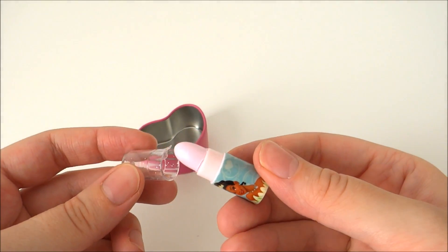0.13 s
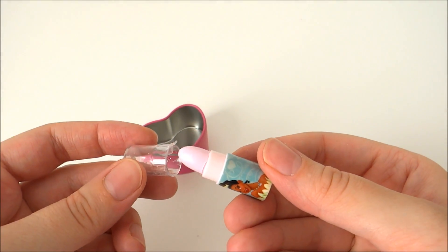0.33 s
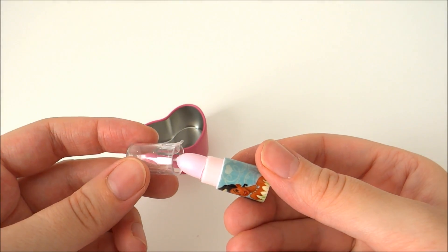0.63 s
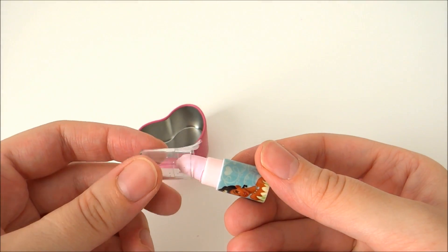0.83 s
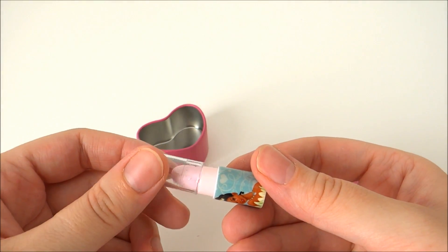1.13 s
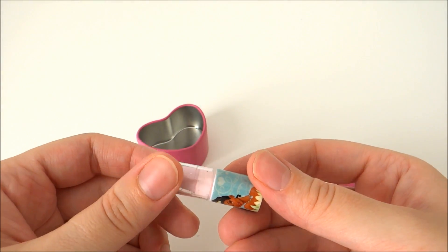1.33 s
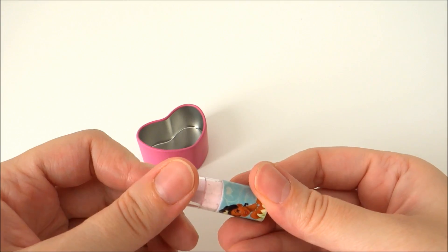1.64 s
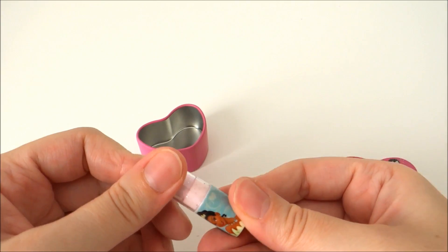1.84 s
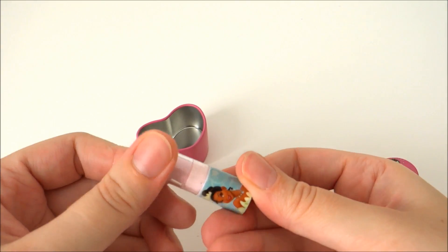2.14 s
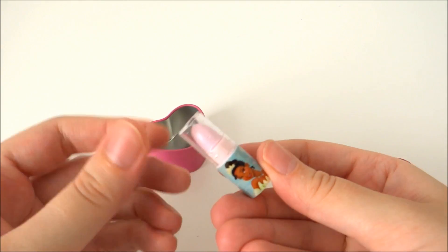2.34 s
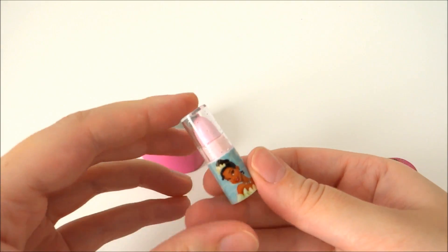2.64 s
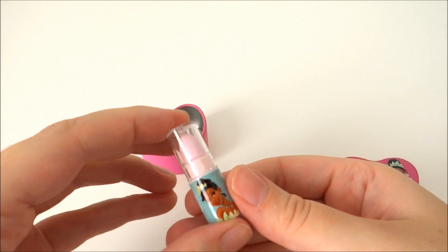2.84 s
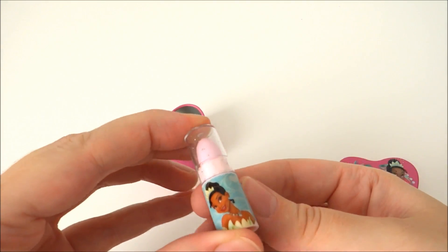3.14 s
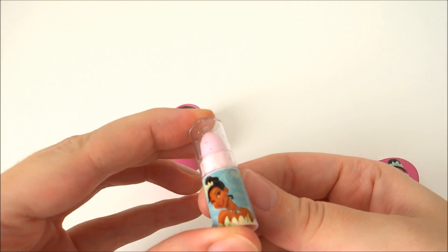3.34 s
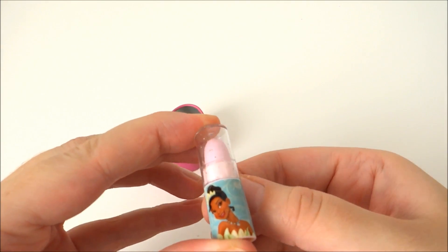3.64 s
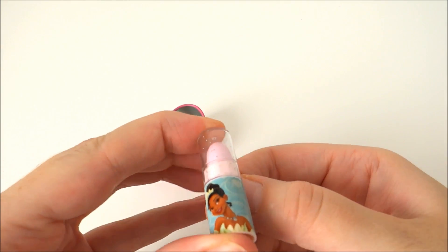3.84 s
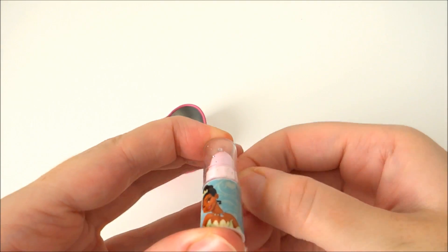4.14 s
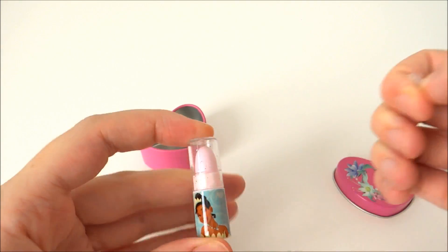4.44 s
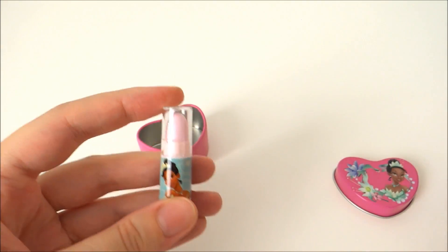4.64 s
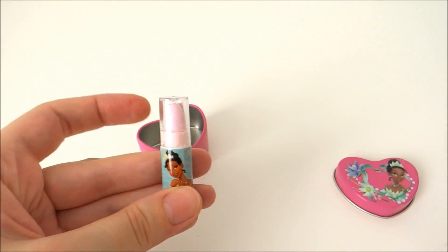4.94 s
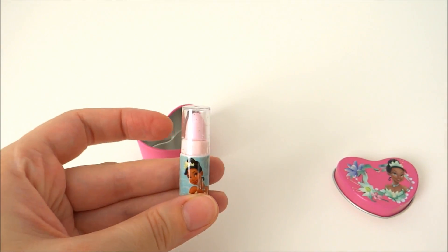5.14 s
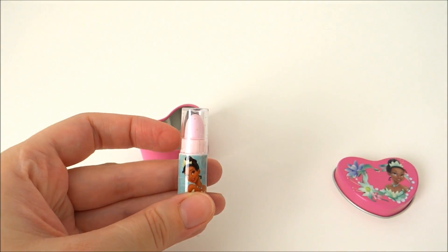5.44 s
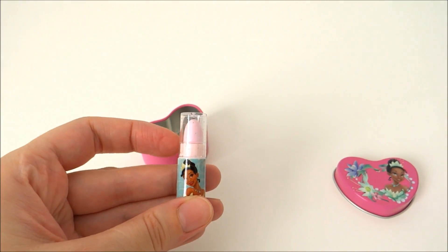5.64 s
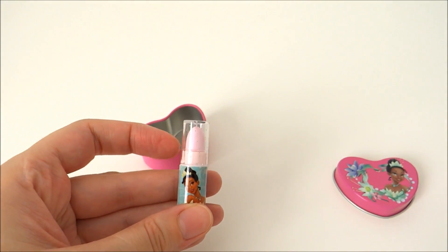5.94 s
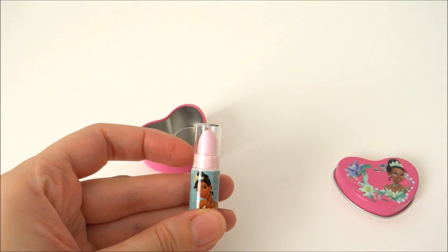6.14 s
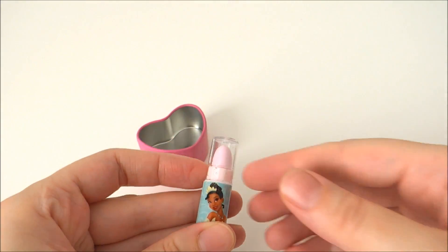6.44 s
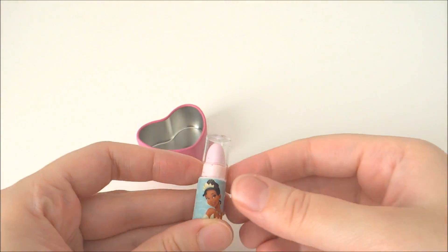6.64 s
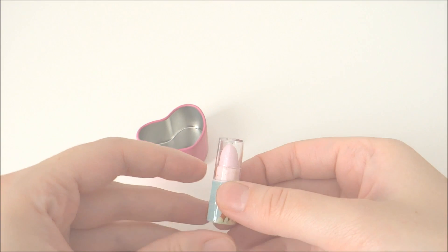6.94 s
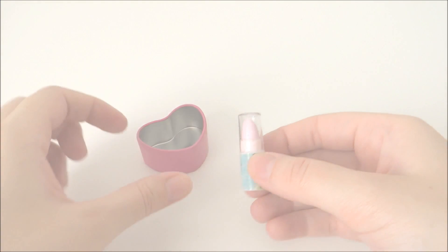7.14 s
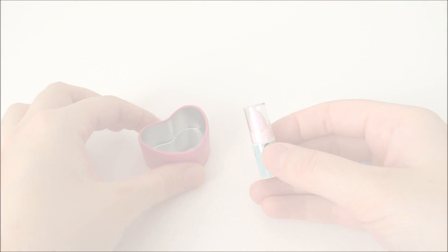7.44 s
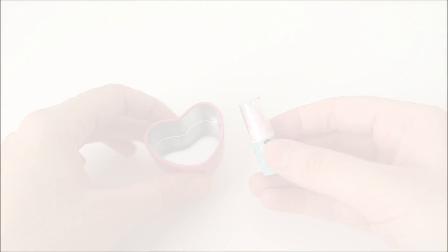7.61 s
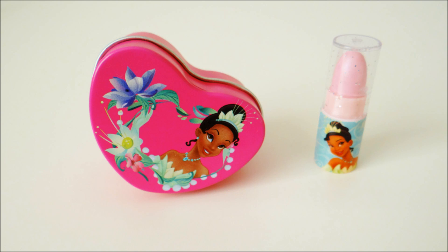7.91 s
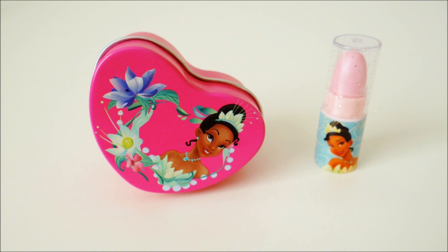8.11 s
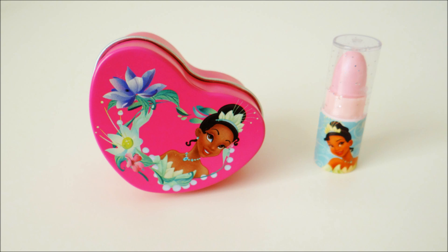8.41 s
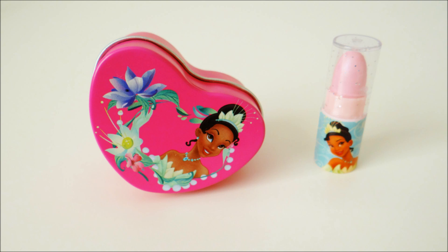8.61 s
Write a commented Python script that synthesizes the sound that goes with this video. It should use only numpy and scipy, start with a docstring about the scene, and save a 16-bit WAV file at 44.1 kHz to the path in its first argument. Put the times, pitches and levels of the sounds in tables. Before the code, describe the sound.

Bright plastic cap ticks and soft table knocks, then growing finger rubbing and sharp crackles, a small tin's scrape and clack, and abrupt silence.

```python
"""A small plastic toy is handled over a table in a quiet room, with faint rumble, hiss and a thin whine.
First come bright ticks of a hard clear cap, soft knocks on the table, and brief buzzes and low hums.
From about 3.5 s fingers rub harder and the ticks grow, loudest near 7 s; a wall and the room answer.
A little tin is dragged, then struck on its rim, and all sound stops soon after.
Knocks, ticks and tin are short pushes ringing resonances; rubbing is many tiny slips of noise."""
import sys
import numpy as np
from scipy import signal
from scipy.fft import rfft, irfft, next_fast_len
from scipy.io import wavfile
from scipy.ndimage import uniform_filter1d

SR = 44100
rng = np.random.default_rng(int(sys.argv[2]) if len(sys.argv) > 2 else 0)


def store_pcm(level_fs):
    """Save levels as 16-bit WAV."""
    pcm = np.round(np.clip(level_fs, -1, 1) * 32767).astype(np.int16)
    wavfile.write(sys.argv[1], SR, np.atleast_2d(pcm).T)


N = 386757

# colour of the room noise, before its overall level is set: (frequency [Hz], relative level [dB per Hz])
NOISE_COLOUR = [(12, -52), (20, -15), (59, -1), (132, -1), (224, -8), (425, -14.5), (516, -18.5),
                (851, -16.5), (1190, -23), (1330, -26.5), (1570, -23), (3920, -30.5), (5950, -34.5),
                (9810, -29), (15300, -41)]
# left-right difference of that noise: (frequency [Hz], side minus mid [dB])
NOISE_WIDTH = [(25, -47.5), (100, -18.5), (300, -5), (700, -1.5), (3000, 0), (9000, -10.5), (13000, -47)]
# resonances that lift the room noise: (frequency [Hz], width [Hz], lift [dB])
NOISE_RESONANCES = [(134, 18, -1.5), (423, 50, 6.5), (687, 190, 6), (860, 58, 5), (1190, 30, 9)]
# far rumble swelling and sinking: (time [s], deep gain [dB], middle gain [dB])
RUMBLE_GAINS = [(0, 0, 5), (.7, 1.5, -7), (1.8, 2.5, -4), (2.6, 4, 1.5), (3.4, 3, -1), (4.2, 4, -0.5),
                (5.2, 0, 3), (8, 1.5, 2.5)]
# low hums from far off: (start [s], end [s], centre frequency [Hz], top level before wavering [dB])
LOW_HUMS = [(2.3, 2.63, 299.4, -45), (2.63, 2.916, 207.5, -46), (4.795, 4.963, 215, -50.5),
            (4.93, 5.305, 163.8, -50.5), (5.394, 5.876, 170.3, -48.5), (6.445, 6.77, 185.3, -52.5)]
# thin high buzzes that come and go: (start [s], end [s], frequency [Hz], width [Hz], level [dB])
HIGH_BUZZES = [(0.147, 0.47, 11100, 700, -61), (1.7, 2.0, 11000, 930, -64), (3.1, 3.45, 11000, 800, -61.5)]
# the room's tail: (frequency [Hz], time to fall 60 dB [s], level [dB], share that differs left and right)
ROOM_TAIL = [(307, 0.33, -1.5, 0.47), (970, 0.28, 0.5, .4), (3020, 0.16, 2, .4), (6700, 0.14, -3.5, .9),
             (13000, 0.29, 4.5, 0.071)]
# what the tin rings with: (frequency [Hz], width [Hz], level [dB])
TIN_MODES = [(450, 80, -8), (640, 55, 0), (850, 120, -4), (1150, 150, -7), (1464, 45, -1), (1760, 22, -4.5),
             (1850, 140, -4), (2200, 500, 2), (2720, 250, -2), (3200, 60, -2), (3600, 400, -12),
             (7250, 300, -8)]
# the tin dragged a little:
# (time [s], peak [dB], brightest frequency [Hz], contact [ms], fall [dB per octave])
TIN_DRAGS = [(7.372, -15.5, 750, 20, 1), (7.46, -31, 500, 40, 10), (7.535, -25, 750, 26, 9)]
# the tin struck on its rim, peak taken before its low cut:
# (time [s], peak [dB], brightest frequency [Hz], contact [ms], fall [dB per octave])
TIN_CLACK = [(7.9418, 1.5, 1800, .3, 11)]
# what the table rings with: (frequency [Hz], width [Hz], level [dB])
TABLE_MODES = [(90.2, 41, -5.5), (126.8, 20, -3), (260, 37, -4), (435, 64, 1.5), (696, 55, -4),
               (773, 29, -3.5), (970, 96, -8.5), (1348, 250, -3), (1607, 68, -3), (2116, 180, -2.5),
               (2437, 140, -0.5), (3200, 660, -0.5)]
# hands and toy bumping the table:
# (time [s], peak [dB], brightest frequency [Hz], contact [ms], fall [dB per octave])
TABLE_KNOCKS = [(0.085, -23.5, 814, 13.5, 3.5), (0.838, -32.5, 1390, 23, 12.5), (1.335, -40, 2080, 19, 30),
                (2.868, -21.5, 120, 2.7, 4.5), (3.079, -31, 2400, 2.1, 15), (3.571, -38, 1300, 9, 25),
                (3.63, -23.5, 200, 3.9, -0.5), (3.87, -27.5, 2550, 8.7, 30), (4.062, -29, 670, 4.5, 46),
                (4.31, -25.5, 108, 9.5, -2.5), (4.829, -31.5, 300, 54, 0.5), (5.0, -31.5, 120, 4.4, 2.5),
                (5.745, -29.5, 970, 5.8, 7), (7.486, -22.5, 130, 1.3, 2.5)]
# skin sliding on the glossy side: (start [s], end [s], frequency [Hz], width [Hz], level before wavering [dB])
SKIN_SLIDE = (4.06, 4.42, 14300, 2500, -47)
# faint rustle of the grip between strokes: (time [s], level [dB], brightness [dB per octave])
GRIP_RUSTLE = [(0, -56.5, 0), (.6, -74, 3), (1.4, -59.5, 5.5), (2.4, -65.5, 6.5), (3.53, -66, 17),
               (3.57, -46.5, 2), (4.2, -45.5, 4.5), (4.6, -49.5, -1.5), (5.5, -52, 3), (6.2, -46, 2.5),
               (7, -35, 2), (7.31, -53, -3.5), (8.05, -47, 3)]
# finger strokes along the plastic: (loudest time [s], level [dB], brightness [dB per octave])
FINGER_STROKES = [(1.16, -47.5, 0), (3.39, -52, -2), (3.682, -36.5, 0.8), (4.01, -42, 5),
                  (4.31, -34.5, 0.5), (4.41, -41, 2), (4.79, -43, 1), (4.899, -34, -0.1),
                  (5.27, -39.5, 1.5), (5.38, -44, 0.5), (5.57, -37, 7), (5.79, -34, -2), (5.88, -30, 0),
                  (6.02, -40.5, -1), (6.36, -34.5, 1.5), (6.59, -33.5, 2), (6.9, -39, 2.5), (7.0, -28.5, 0),
                  (7.2, -39.5, -2), (7.64, -40, -1.3), (7.86, -44.5, -2.2)]
# what the plastic rings with: (frequency [Hz], width [Hz], level [dB])
PLASTIC_MODES = [(1500, 1200, -6), (2480, 980, -3), (3770, 1500, -2.5), (5400, 2600, 2.5), (7470, 1500, 1),
                 (8683, 1300, -0.5), (9440, 840, -6), (11700, 2500, -10.5), (14200, 2500, -12.5)]
# ticks and crackles, peak taken before the snap is added:
# (time [s], peak [dB], brightest frequency [Hz], contact [ms])
PLASTIC_TICKS = [(0.0855, -30.5, 1990, 2.5), (0.1373, -26, 7200, 3.1), (0.845, -19.5, 5040, 2.4),
                 (1.1416, -24.5, 8800, 6.6), (1.3432, -30.5, 9600, 2.1), (1.956, -22.5, 10300, 3.3),
                 (2.0165, -31, 9350, 4.9), (2.3052, -35, 8700, 4.1), (2.3441, -35, 11000, 1.5),
                 (2.4185, -18, 9500, 2.5), (2.6508, -33.5, 8700, 2.2), (2.6837, -33, 8840, 2.3),
                 (2.79, -30.5, 11600, 1.5), (2.881, -37, 4000, 1.7), (3.0294, -23.5, 9800, 2.35),
                 (3.0636, -31, 6600, 1.6), (3.0795, -14, 7740, 1.5), (3.345, -38, 8580, 4.1),
                 (3.5687, -29, 4100, 4.1), (3.6223, -30, 3520, 4.6), (3.6546, -15, 7000, 2.7),
                 (3.765, -25, 6900, 3.4), (3.8704, -9, 6960, 3.1), (4.0653, -10.5, 7250, 4.5),
                 (4.136, -22, 9800, 2.5), (4.194, -27.5, 11700, 2.5), (4.2993, -20, 8800, 3.6),
                 (4.3135, -16.5, 7450, 7), (4.4533, -25, 8050, 2), (4.641, -22, 8460, 1.83),
                 (4.7586, -25, 7730, 1.6), (4.8404, -18.5, 7700, 4.7), (4.8895, -16.5, 8800, 2.3),
                 (4.936, -19, 9290, 4.8), (5.0117, -14.5, 9850, 0.77), (5.04, -23, 9600, 2.9),
                 (5.1304, -22.5, 8250, 3.4), (5.21, -30, 9500, 2.8), (5.254, -23, 6900, 4.5),
                 (5.643, -23.5, 7570, 4.3), (5.746, -16.5, 9200, 5.1), (5.8032, -18, 8600, 2.1),
                 (5.847, -14.5, 6440, 3), (5.992, -19.5, 7060, 10.6), (6.2921, -21.5, 2570, 4.9),
                 (6.313, -7.5, 4260, 2.3), (6.4885, -18, 4970, 5), (6.4969, -7, 7050, 3.5),
                 (6.5573, -7, 7750, 0.99), (6.578, -14, 7500, 2.5), (6.6048, -13, 8800, 1.5),
                 (6.6884, -10, 7400, 3.1), (6.6951, -0.5, 7150, 1.78), (6.796, -10, 5360, 1.37),
                 (6.8463, -3.5, 6800, 2), (6.9432, 0, 6830, 3.2), (7.0296, -10.5, 7550, 3.2),
                 (7.1216, -2.5, 5250, 4.9), (7.2644, -24, 3720, 1.2), (7.3398, -15, 9800, 2.1),
                 (7.545, -35, 2190, 2), (7.657, -27, 6800, 4.1), (7.808, -24, 8450, 1.7)]

FLOOR_DB = -47.5  # room noise before the rumble swells
WHINE_HZ, WHINE_DB = 9752, -72  # level before wavering
BUZZ_HZ = 112  # pulses a second
WALL_S, WALL_DB = .0100, -6
NEAR_PAN_DB = 1.2  # left minus right
KNOCK_ROOM_DB, TIN_ROOM_DB = -6, -7  # how much of each goes into the room
STROKE_RISE_DB_S, STROKE_FALL_DB_S = 129.5, 151.5
# after a tick the skin slips on: a rub below the tick's peak level that dies away and shares its colour
TRAIL_DB, TRAIL_RISE_DB_S, TRAIL_FALL_DB_S = -26, 1199, 218
TRAIL_COLOUR = 3  # dB per octave of tilt for each octave the tick is above 6 kHz
SNAP_DB, SNAP_MS = -7, 0.36  # relative to the tick's peak; contact time
CAP_UNTIL_S, CAP_TOP_DB = 3.5, 13  # the hard clear cap, heard first: lift above 11 kHz
END_S = 8.051
TOP_HZ = 15900


def undb(db):
    """Decibels become a plain factor."""
    return 10 ** (np.asarray(db) / 20)


def unit(x):
    """Scales a signal to an average (rms) strength of 1."""
    return x / np.sqrt(np.mean(x ** 2))


def band(x, hz, width):
    """Resonance of gain 1 at its centre."""
    return signal.lfilter(*signal.iirpeak(min(hz, .45 * SR), hz / width, fs=SR), x)


def mode(x, hz, width):
    """A resonance with steep skirts, scaled so noise leaves it about as strong whatever its width."""
    skirt_width = np.clip(3 * width, hz / 3, hz)
    return band(band(x, hz, width), hz, skirt_width) * np.sqrt(1000 / width)


def walk(rate):
    """A slow random waver: new levels rate times a second, smoothed twice into gentle curves."""
    hold = int(SR / rate)
    steps = np.repeat(rng.standard_normal(N // hold + 1), hold)
    smooth = uniform_filter1d(uniform_filter1d(steps, hold), hold)
    return 1.01 * smooth[:N]


def curves(table):
    """Columns of a table joined by straight lines in time."""
    s, *columns = np.transpose(table)
    return [np.interp(np.arange(N) / SR, s, column) for column in columns]


def swell(start, end, rise):
    """Grows over the share rise of its length, holds, stops within 30 ms."""
    full = start + rise * (end - start)
    return np.interp(np.arange(N) / SR, [start, full, end - .03, end], [0, 1, 1, 0])


def lean(hz, bright_hz, fall_db):
    """Modes away from the brightest frequency are excited less, fall_db an octave."""
    return undb(-fall_db * np.abs(np.log2(hz / bright_hz)))


def hits(s, peak_db, bright_hz, contact_ms, fall_db, modes, smooth, size, rise=.3, grain_db=2.5):
    """Each blow is a push, quick to grow and slower to die, roughened by uneven grains, that rings the modes."""
    contacts = np.arange(size) / SR * 1000 / np.maximum(contact_ms, .2)[:, None]  # time in contact times
    grains = undb(grain_db * rng.exponential(size=(len(s), size // 16))).repeat(16, axis=1)
    shape = np.minimum(contacts / rise, 1) * np.exp(-np.maximum(contacts - rise, 0))
    push = (smooth + rng.standard_normal((len(s), size)) * grains) * shape
    ring = 0
    for hz, width, db in modes:
        ring = ring + mode(push, hz, width) * undb(db) * lean(hz, bright_hz, fall_db)[:, None]
    ring *= (undb(peak_db) / np.abs(ring).max(axis=1))[:, None]
    out = np.zeros(N + size)
    for start, wave in zip((s * SR).astype(int), ring):
        out[start:start + size] += wave
    return out[:N]


def on_log(table, hz):
    """Joins table points by straight lines along a scale of octaves."""
    table_hz, db = np.transpose(table)
    return np.interp(np.log(hz), np.log(table_hz), db)


def floor():
    """Room rumble and hiss: coloured noise lifted at resonances, its low parts wavering, its bass narrow."""
    size = next_fast_len(N)
    hz = np.maximum(np.arange(size // 2 + 1) * SR / size, 1)
    db = on_log(NOISE_COLOUR, hz)
    for centre, width, lift in NOISE_RESONANCES:
        db = db + lift / (1 + (2 * (hz - centre) / width) ** 2)
    mid, side = (rfft(rng.standard_normal(size)) * undb(db) for _ in range(2))
    both = mid + side * undb(on_log(NOISE_WIDTH, hz)) * np.array([[1], [-1]])
    # split softly at 160 and 600 Hz
    under_160, under_600 = 1 / (1 + (hz / 160) ** 4), 1 / (1 + (hz / 600) ** 4)
    shares = (under_160, under_600 - under_160, 1 - under_600)
    deep, middle, hiss = (irfft(both * share, size)[:, :N] for share in shares)
    scale = undb(FLOOR_DB) / np.std(deep + middle + hiss)
    deep_db, middle_db = curves(RUMBLE_GAINS)
    deep = deep * undb(deep_db + 1.3 * walk(7.4))
    middle = middle * undb(middle_db + 1.6 * walk(9.2))
    return scale * (deep + middle + hiss)


def whine():
    """A thin, lasting sine tone whose level and phase waver a little."""
    phase = 2 * np.pi * WHINE_HZ * np.arange(N) / SR + 1.5 * walk(40)
    return undb(WHINE_DB + 1.5 * walk(8.1)) * np.sqrt(2) * np.sin(phase)


def hums():
    """Far low sine tones that swell and stop, with wavering pitch and level."""
    out = np.zeros(N)
    for start, end, hz, db in LOW_HUMS:
        phase = 2 * np.pi * np.cumsum(hz * (1 + 0.00648 * walk(10))) / SR
        level = undb(db + 1.7 * walk(13)) * swell(start, end, rise=0.53)
        out += level * np.sqrt(2) * np.sin(phase)
    return out


def buzzes():
    """Noise in regular pulses, each fading until the next, filtered to a high narrow band."""
    turns = np.arange(N) / SR * BUZZ_HZ % 1
    pulses = np.exp(-turns / 0.82) * rng.standard_normal(N)
    out = np.zeros(N)
    for start, end, hz, width, db in HIGH_BUZZES:
        tone = unit(band(band(pulses, hz, width), hz, width))
        out += undb(db) * swell(start, end, rise=0.27) * tone
    return out


def room(x):
    """A wall gives a clear slap; the room adds a tail fading band by band, partly different left and right."""
    t = np.arange(SR // 2) / SR
    echo = np.zeros((2, len(t)))
    for hz, t60, db, share in ROOM_TAIL:
        mid, side = (unit(mode(rng.standard_normal(len(t)), hz, hz)) for _ in range(2))
        fade = undb(db - 60 * t / t60) / np.sqrt(t60 * SR)
        echo += fade * (mid + share * side * np.array([[1], [-1]]))
    echo *= np.clip((t - .002) / 0.0018, 0, 1)  # the tail opens from 2 ms
    slap = band(np.eye(1, 64)[0], 8000., 7400.0)  # the wall returns mostly treble
    start = int(WALL_S * SR)
    echo[:, start:start + len(slap)] += undb(WALL_DB) * slap
    return signal.fftconvolve(x[None], echo, axes=1)[:, :N]


def knocks():
    """Hands and toy bump the table; weight behind a blow gives a one-way push."""
    return hits(*np.transpose(TABLE_KNOCKS), TABLE_MODES, smooth=0.92, size=8192)


def tin_drags():
    """Rough pushes drag the tin while fingers on the rim damp its clearest ring."""
    held = [m for m in TIN_MODES if not 1700 < m[0] < 1900]
    return hits(*np.transpose(TIN_DRAGS), held, smooth=0, size=8192, rise=.7, grain_db=1)


def tin_clack():
    """A light, quick blow on the rim leaves the tin's low modes at rest."""
    high = [m for m in TIN_MODES if m[0] > 1300]
    clack = hits(*np.transpose(TIN_CLACK), high, smooth=8, size=8192)
    return signal.sosfilt(signal.butter(6, 1330, "high", fs=SR, output="sos"), clack)


def slide():
    """Skin sliding on the glossy side: a smooth, very high band of friction noise, wavering."""
    start, end, hz, width, db = SKIN_SLIDE
    hiss = unit(mode(rng.standard_normal(N), hz, width))
    return undb(db + 3 * walk(39.6)) * swell(start, end, rise=0.16) * hiss


def friction():
    """Level and brightness of the rubbing: grip, strokes and the trails of ticks add in power."""
    t = np.arange(N) / SR
    db, tilt_db = curves(GRIP_RUSTLE)
    power = undb(2 * db)
    tilted = power * tilt_db
    rubs = [(s, g, tilt, STROKE_RISE_DB_S, STROKE_FALL_DB_S) for s, g, tilt in FINGER_STROKES]
    for s, peak_db, hz, _ in PLASTIC_TICKS:
        tilt = TRAIL_COLOUR * np.log2(hz / 6000)
        rubs.append((s, peak_db + TRAIL_DB, tilt, TRAIL_RISE_DB_S, TRAIL_FALL_DB_S))
    for s, top_db, tilt, rise, fall in rubs:
        near = slice(max(int((s - .5) * SR), 0), int((s + .5) * SR))
        drop_db = np.maximum(rise * (s - t[near]), fall * (t[near] - s))
        part = undb(2 * (top_db - drop_db))
        power[near] += part
        tilted[near] += part * tilt
    # brightness is the average of all rubs, weighted by power
    return 10 * np.log10(power), tilted / power


def rub():
    """Dense tiny slips of very uneven size feed the plastic's modes, each mode wavering on its own."""
    db, tilt_db = friction()
    slips = (rng.random(N) < 900. / SR) * undb(3.08 * rng.exponential(size=N))  # about 900 a second
    # each slip dies away over 1.2 ms, above a steady pressure
    pressure = signal.lfilter([1], [1, -np.exp(-1 / (0.0012 * SR))], slips) + 0.62
    parts = []
    for hz, width, mode_db in PLASTIC_MODES:
        ring = mode(pressure * rng.standard_normal(N), hz, width)
        parts.append((hz, ring * undb(mode_db + 4.4 * walk(14))))
    even = np.std(sum(part for _, part in parts))
    coloured = sum(part * undb(tilt_db * np.log2(hz / 7000)) for hz, part in parts)
    return coloured / even * undb(db + 2.0 * walk(45))


def ticks():
    """Hard plastic edges catch and let go: a short crackle with a sharp, broad snap as it grows."""
    rows = np.array(PLASTIC_TICKS)
    early = rows[:, 0] < CAP_UNTIL_S
    cap = [(hz, width, db + CAP_TOP_DB * (hz > 11000)) for hz, width, db in PLASTIC_MODES]
    out = 0
    for group, modes in ((rows[early], cap), (rows[~early], PLASTIC_MODES)):
        s, db, hz, ms = group.T
        crackle = hits(s, db, hz, ms, 17.5, modes, smooth=0, size=4096, rise=.6)
        snap_s, snap_ms = s + .3 * ms / 1000, np.full(len(s), SNAP_MS)
        snap = hits(snap_s, db + SNAP_DB, hz, snap_ms, 9.3, modes, smooth=0, size=1024)
        out = out + crackle + snap
    return out


def scene():
    """Near sounds sit slightly left and ring the room, over the noise and faint tones."""
    background = floor() + whine() + hums() + buzzes()
    table = knocks()
    metal = tin_drags() + tin_clack()
    plastic = slide() + rub() + ticks()
    near = (plastic + table + metal) * undb([[NEAR_PAN_DB / 2], [-NEAR_PAN_DB / 2]])
    into_room = plastic + undb(KNOCK_ROOM_DB) * table + undb(TIN_ROOM_DB) * metal
    return near + room(into_room) + background


def record(dry):
    """The loudest peaks clip, the sound stops dead at the end and the top is cut."""
    on = np.clip((END_S - np.arange(N) / SR) / .002, 0, 1)  # a 2 ms stop
    top_cut = signal.ellip(10, .2, 95, TOP_HZ, fs=SR, output="sos")
    return signal.sosfilt(top_cut, np.clip(dry, -.93, .93) * on)


dry = scene()
out = record(dry)
store_pcm(out)
```